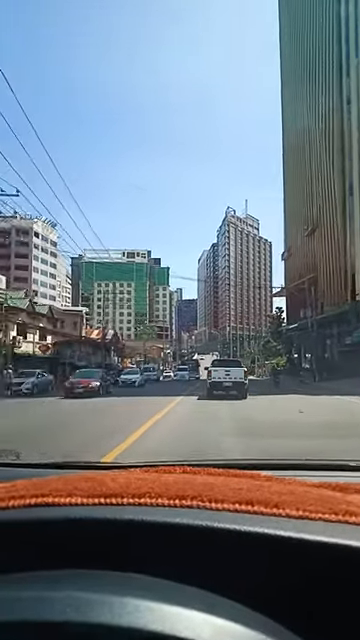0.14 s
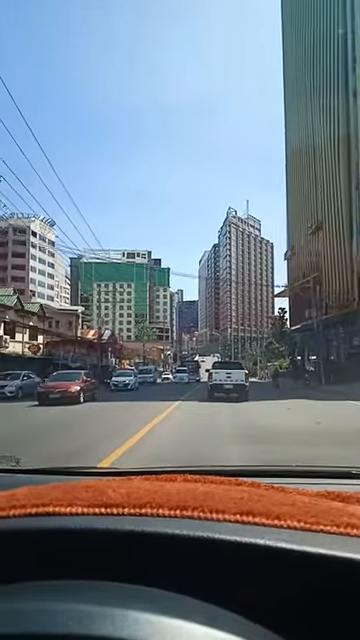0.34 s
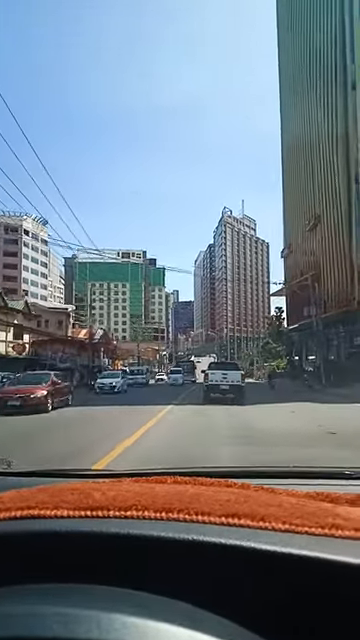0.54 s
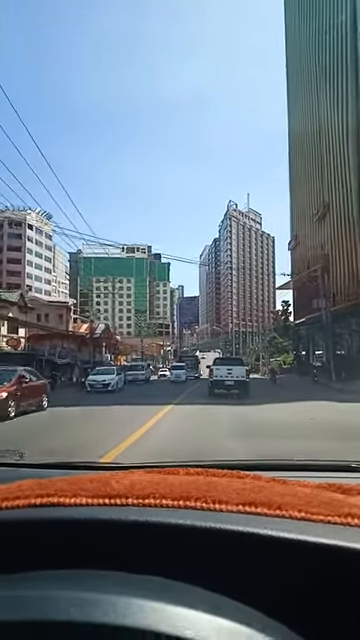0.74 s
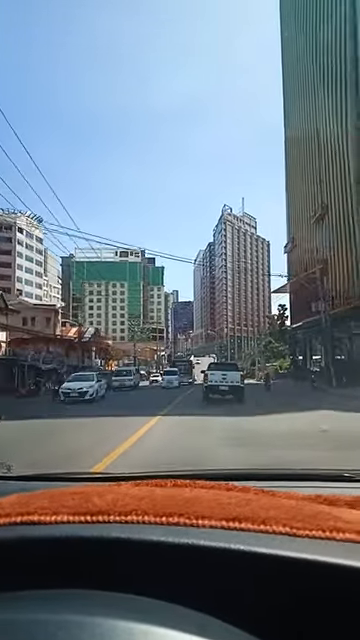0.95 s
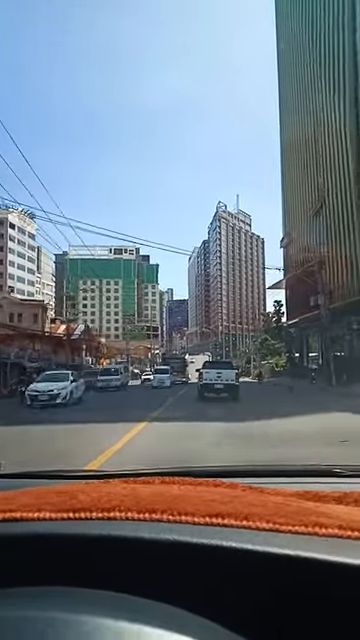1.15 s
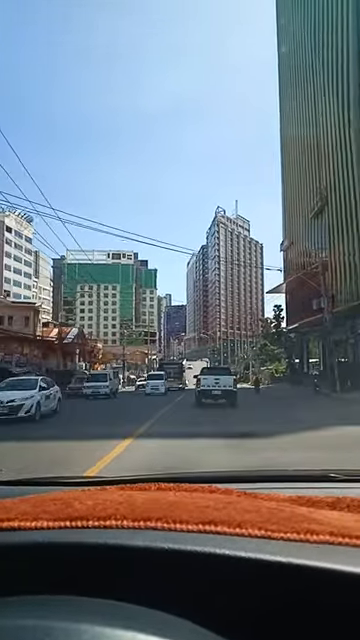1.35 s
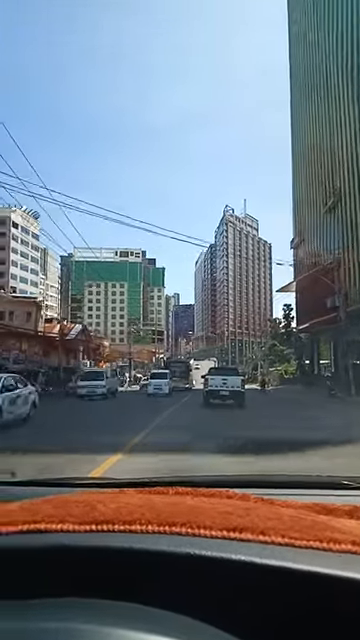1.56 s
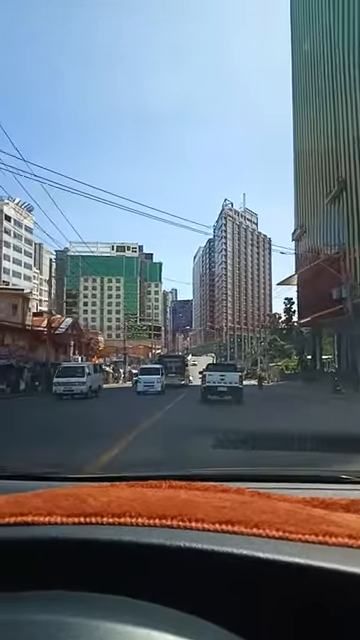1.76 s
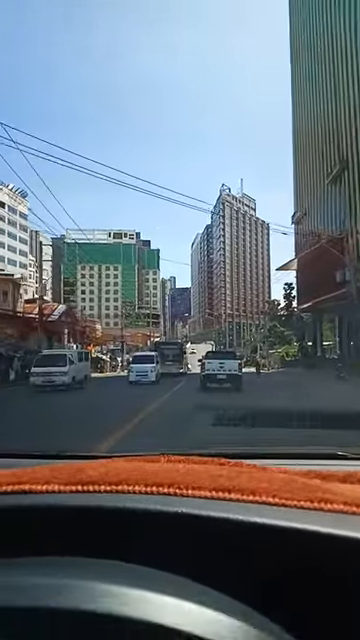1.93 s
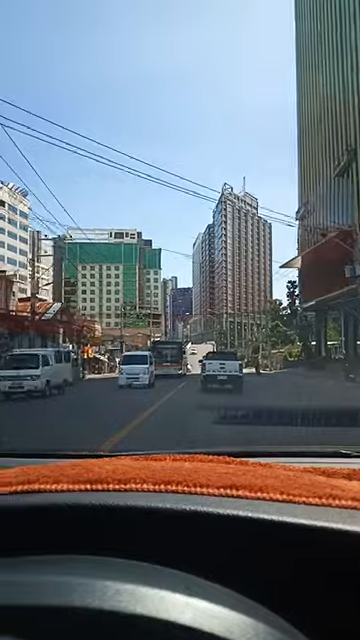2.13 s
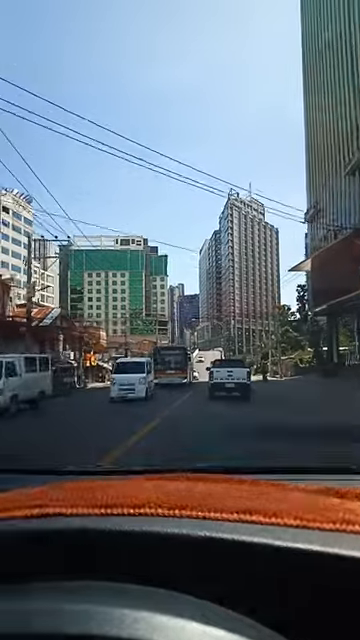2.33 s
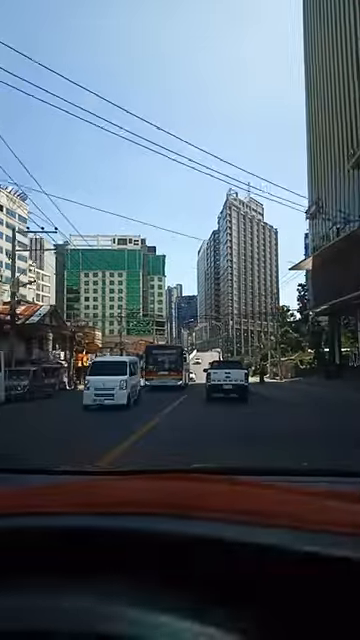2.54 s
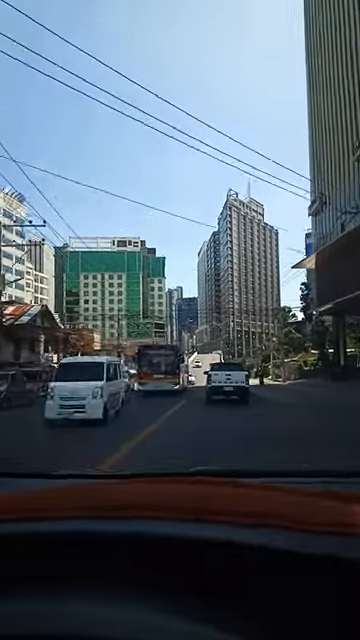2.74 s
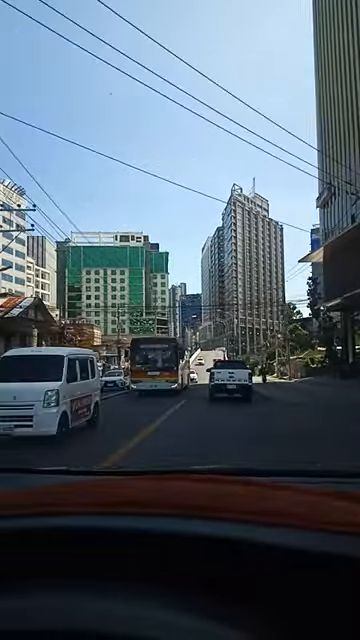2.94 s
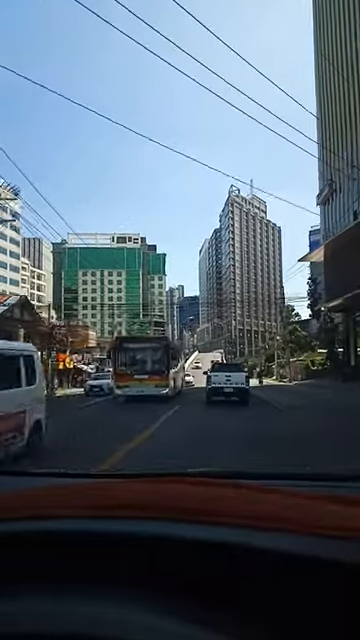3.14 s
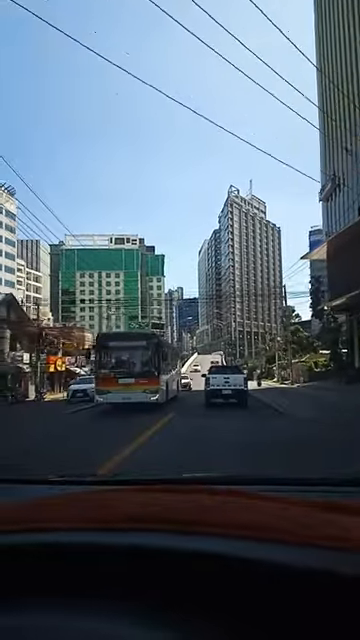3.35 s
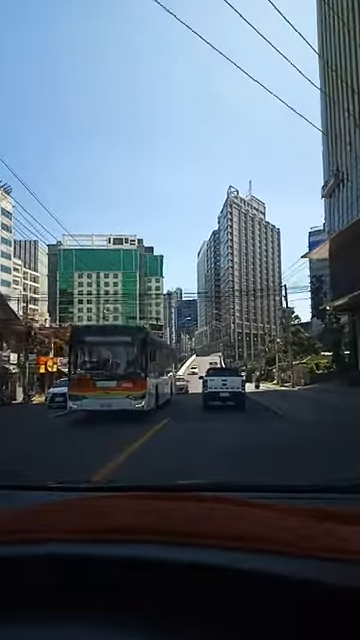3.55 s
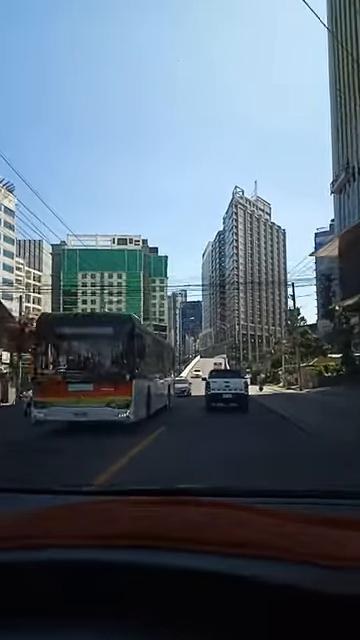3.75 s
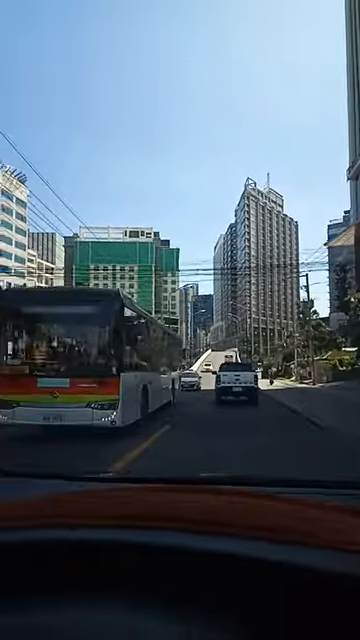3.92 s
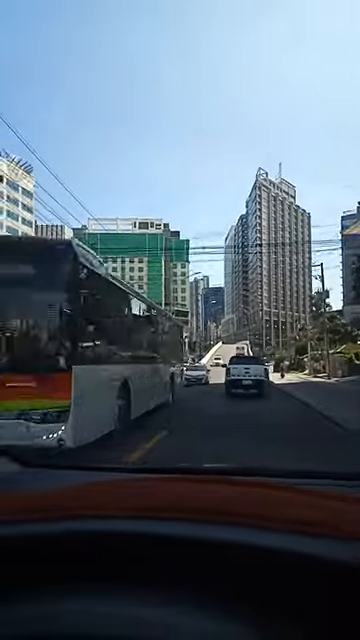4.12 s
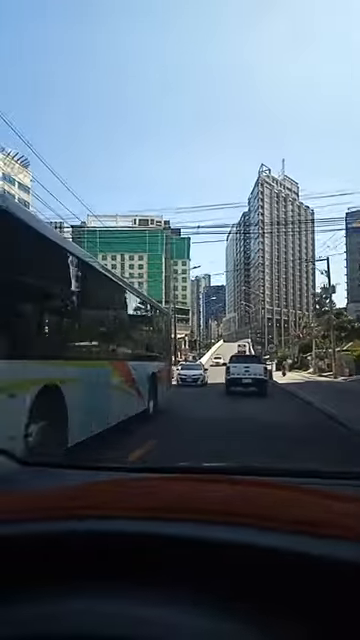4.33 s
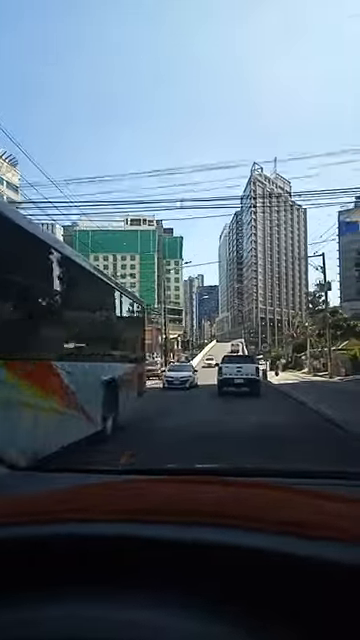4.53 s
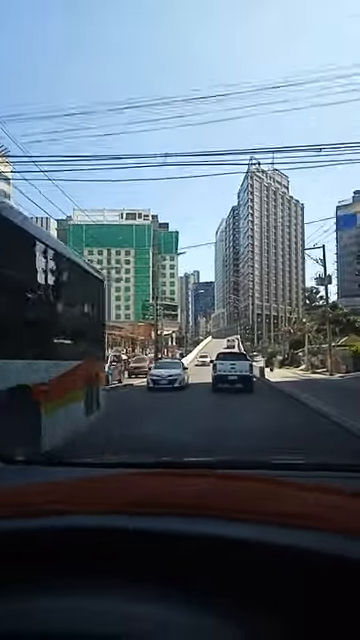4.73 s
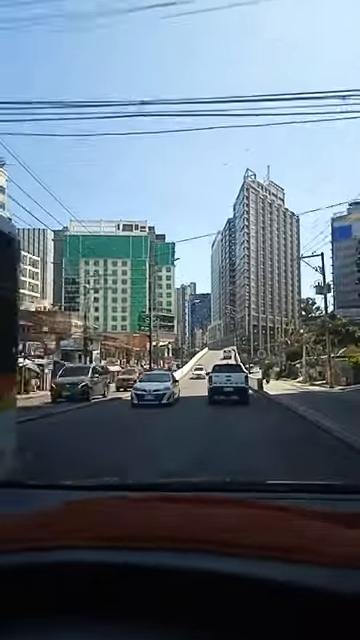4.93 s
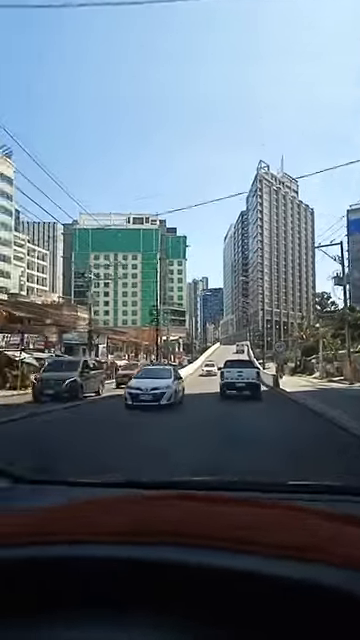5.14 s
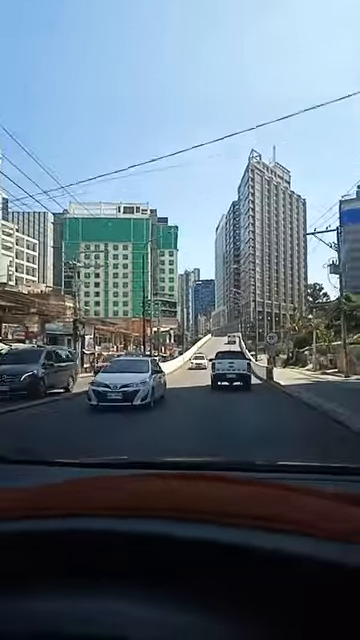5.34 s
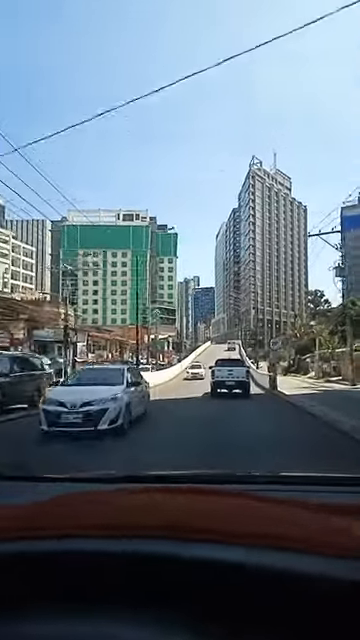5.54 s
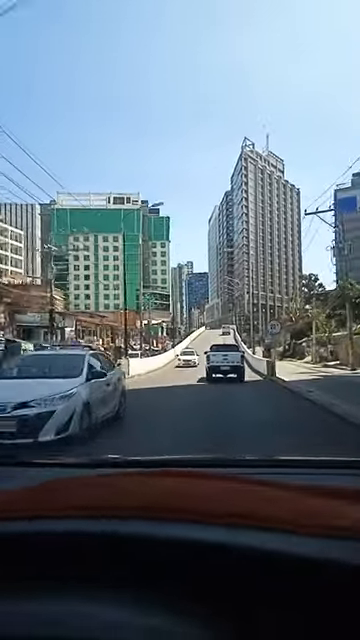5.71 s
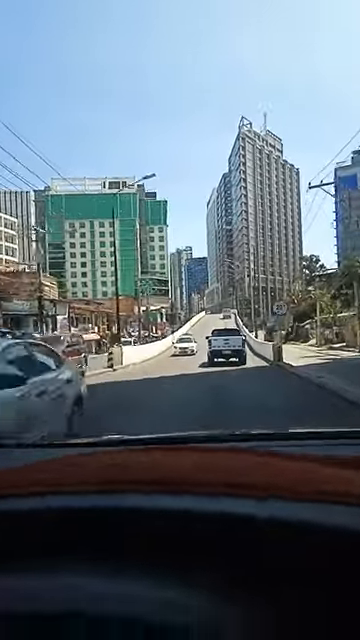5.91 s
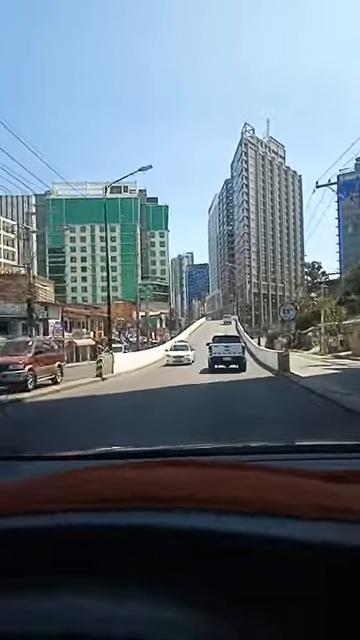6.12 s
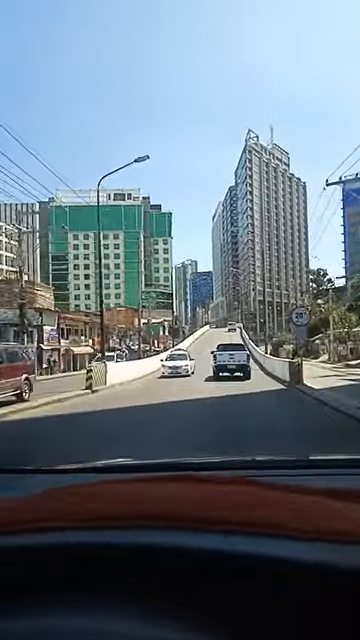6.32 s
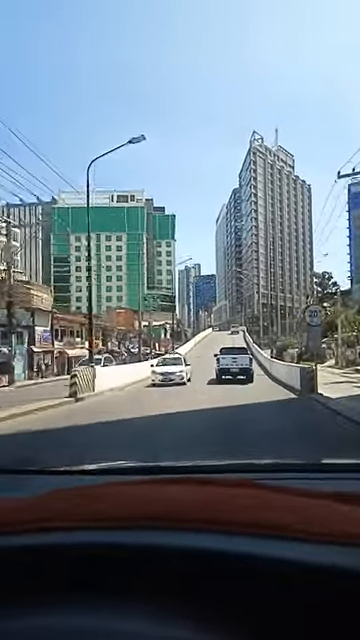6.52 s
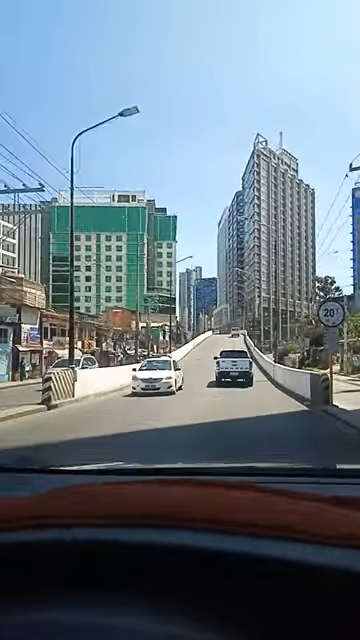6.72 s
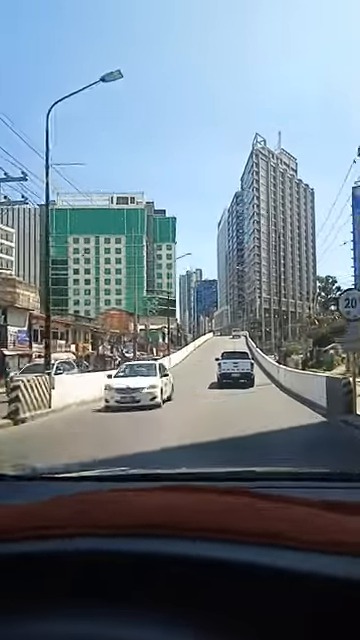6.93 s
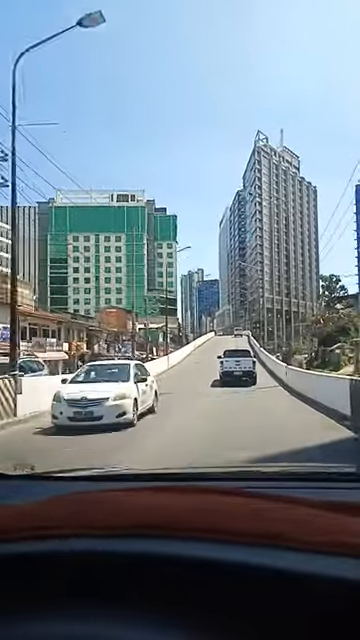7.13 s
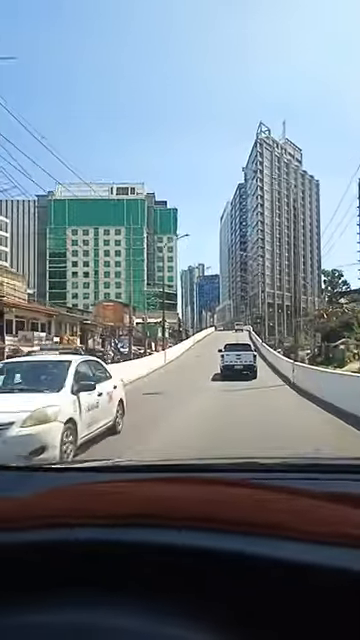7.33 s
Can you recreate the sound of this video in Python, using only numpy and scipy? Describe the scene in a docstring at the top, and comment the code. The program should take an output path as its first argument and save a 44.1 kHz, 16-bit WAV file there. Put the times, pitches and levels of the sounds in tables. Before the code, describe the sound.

Muffled cabin road noise throbs and knocks along a city street, swelling with a passing bus's deep boom before humming up a ramp.

```python
"""Inside a closed car rolling along a city street, with a phone as the microphone at the driver's seat.
The tyres drum through the body and ring the cabin (coloured noise), air rushes softly, small bumps throb.
The wheels knock over seams (decaying body tones) and the trim clacks now and then (noise bursts).
An oncoming bus booms past at about five seconds (engine orders with a Doppler drop, and a rumbling wake);
then the car pulls onto a ramp, where the surface is coarser and its own engine hums a little louder."""
import sys
import numpy as np
from scipy import signal
from scipy.fft import rfft, irfft
from scipy.io import wavfile
from scipy.ndimage import uniform_filter1d, map_coordinates

SR = 44100
rng = np.random.default_rng(int(sys.argv[2]) if len(sys.argv) > 2 else 0)


def persist_wave(psi):
    """Save psi, clipped to +-1, as 16-bit WAV."""
    counts = np.round(np.clip(psi, -1, 1) * 32767).astype(np.int16)
    wavfile.write(sys.argv[1], SR, np.atleast_2d(counts).T)


N = 329420
T = np.arange(N) / SR  # time [s]
RAMP_S, RAMP_FADE_S = 5.56, 0.52  # the ramp's coarser surface: middle and length of the change [s]

# cabin and tyre-cavity resonances: (centre [Hz], width [Hz], lift [dB])
CABIN_MODES = [(58, 11, 5.5), (83, 11, 5), (168, 16, 2), (317, 17, 1), (420, 28, -1), (469, 38, 5.5),
               (663, 65, 3), (933, 12, 7), (1107, 43, -3.5), (1158, 35, 3.5), (1480, 25, 4.5),
               (1631, 66, 5), (1800, 50, 2), (1948, 29, 6), (2108, 50, 3), (2400, 59, 3), (2720, 120, 1.5)]


def undb(db):
    """Decibels to gain."""
    return 10 ** (np.asarray(db) / 20)


def unit(x):
    """Scale to rms 1."""
    return x / np.sqrt(np.mean(x ** 2))


def walk(rate):
    """Smooth random wander with rms 1, from random steps drawn `rate` times a second."""
    k = int(SR / rate)
    steps = np.repeat(rng.standard_normal(N // k + 1), k)
    smooth = uniform_filter1d(uniform_filter1d(steps, k), k)
    return unit(smooth[:N])


def noise(colour, resonances=()):
    """Random forcing heard through a broad colour and narrow resonances; rms 1."""
    f = np.arange(N // 2 + 1) * SR / N
    hz, db = np.transpose(colour)
    gain_db = np.interp(np.log(f + 1), np.log(hz), db)
    for centre, width, lift_db in resonances:
        gain_db = gain_db + lift_db * np.exp(-2 * ((f - centre) / width) ** 2)
    muffle = np.maximum(f / hz[-1], 1) ** -2  # less and less gets through above the last point
    spectrum = rfft(rng.standard_normal(N))
    return unit(irfft(spectrum * undb(gain_db) * muffle, N))


def push_and_decay(age, rise, t60):
    """Envelope of a soft contact: a short linear push, then a free decay of 60 dB in t60 seconds."""
    return np.minimum(age / rise, 1) * undb(-60 * np.maximum(age - rise, 0) / t60)


def blow(start, rise, t60):
    """A soft contact that begins at a given moment."""
    return push_and_decay(np.maximum(T - start, 0), rise, t60)


def ramp(middle, length):
    """Goes evenly from 0 to 1, centred on a moment."""
    return np.clip((T - middle) / length + .5, 0, 1)


def hump(middle, half_length):
    """Rises smoothly from 0 to 1 and back."""
    return np.exp(-((T - middle) / half_length) ** 2)


def waver(x, share, rate):
    """Plays a sound at a wandering speed, so every pitch drifts by a small share."""
    position = np.cumsum(1 + share * walk(rate=rate))
    return map_coordinates(x, [position], order=3, mode="mirror")


def engine(hz, db, orders, jitter, rough_db):
    """Orders of an unsteady firing rate [Hz], each throbbing on its own by rough_db; db sets the level."""
    phase = 2 * np.pi * np.cumsum(hz * (1 + jitter * walk(rate=20))) / SR
    tone = 0
    for k, order_db in orders:
        throb = undb(order_db + rough_db * walk(rate=13))
        tone = tone + throb * np.sin(k * phase + rng.uniform(0, 2 * np.pi))
    return unit(tone) * undb(db)


def road(patchy_db=1.77, flutter_db=1.5, patter_db=1.1, grain_db=1.24, gust_db=0.7):
    """Uneven asphalt shakes body and tread, whose ring drifts in pitch; the air barely wavers."""
    # colours of body rumble, tread through doors and floor, coarse-asphalt drone, and air from
    # the vents and round the windows: (frequency [Hz], relative density [dB])
    rumble_colour, tread_colour = [(18, -32.5), (28, -18), (42, -18), (56, -6), (68, -10.5), (85, -3.5),
                                   (125, -0.5), (172, -3), (205, -10.5), (270, -21), (370, -23),
                                   (450, -33.5), (800, -54)], [(200, 1), (380, -2), (480, -1.5), (570, 0), (690, -0.5),
                                                   (770, -4), (1000, -10.5), (1400, -19.5), (2500, -41),
                                                   (5000, -68.5)]
    drone_colour, air_colour = [(140, -34.5), (225, 2), (340, 0.5), (400, -4), (520, -24.5), (900, -38)], [(300, 5), (1000, 1.5), (1650, 0), (2400, -6),
                                                       (3000, -8), (3500, -10.5), (4000, -16),
                                                       (4500, -23.5), (5500, -35), (9000, -59.5)]
    # worn stretches that raise the drone: (middle [s], half length [s], lift [dB])
    worn_stretches = [(1.5, 0.54, 6.5), (3.1, 0.48, 4.5), (7.346, 0.1, 3.5)]

    coarse = ramp(RAMP_S, RAMP_FADE_S)
    climb_s = np.maximum(T - RAMP_S, 0)
    beside_bus = hump(5.25, 0.46)  # the bus's tyres roll by
    worn_db = sum(lift_db * hump(s, half) for s, half, lift_db in worn_stretches)

    # base level [dB], then what the gathering speed, ramp, climb [dB/s] and bus tyres add
    rumble_db = -41 + 0.36 * T - 0.6 * coarse
    tread_db = -51 - 0.15 * coarse + 1.25 * climb_s + 2.5 * beside_bus
    drone_db = -56.5 + worn_db + 5 * coarse + 3 * climb_s + 8 * beside_bus
    air_db = -58.5 + 0.85 * coarse + 1 * beside_bus

    patches = patchy_db * walk(rate=16)
    rumble = noise(rumble_colour, CABIN_MODES) * undb(rumble_db + patches + flutter_db * walk(rate=45))
    tread = noise(tread_colour, CABIN_MODES)
    tread = tread * undb(tread_db + patter_db * walk(rate=28) + grain_db * walk(rate=70))
    drone = noise(drone_colour, CABIN_MODES) * undb(drone_db + patchy_db * walk(rate=20))
    air = noise(air_colour, CABIN_MODES) * undb(air_db + gust_db * walk(rate=14))
    return rumble + waver(tread + drone, share=.025, rate=7) + air


def rings(drift=.04, max_drift_hz=16, swell_db=2.5, ramp_db=2):
    """Rolling tyres sound a few resonances, each swelling alone and sliding in pitch as the load shifts."""
    # tyre and body resonances: (centre [Hz], width [Hz], rms level on the smooth street [dB])
    ring_modes = [(176, 18, -51), (334.6, 30, -62.5), (491.7, 36, -60.5), (665.5, 50, -62)]
    out = 0
    for hz, width, db in ring_modes:
        drift_hz = min(drift * hz, max_drift_hz)
        phase = 2 * np.pi * np.cumsum(hz + drift_hz * walk(rate=6)) / SR
        # two slow random weights make a narrow band of noise round the moving pitch
        ring = walk(rate=2 * width) * np.cos(phase) + walk(rate=2 * width) * np.sin(phase)
        out = out + unit(ring * undb(swell_db * walk(rate=9))) * undb(db)
    return out * undb(ramp_db * ramp(RAMP_S, RAMP_FADE_S))


def bumps(count=95, middle_hz=148.3, pitch_spread=0.27, middle_db=-37, scatter_db=4.0):
    """Small bumps in the asphalt set the body throbbing at uneven moments and at differing pitches."""
    out = np.zeros(N + SR // 4)
    age = np.arange(SR // 4) / SR
    shape = push_and_decay(age, rise=0.018, t60=0.07)
    for k, (place, pitch, size) in enumerate(rng.uniform(-0.996, 1, (count, 3))):
        i = int((k + .5 + .5 * place) / count * N)  # anywhere within its own slot
        hz = middle_hz * (1 + pitch_spread * pitch)
        throb = shape * np.sin(2 * np.pi * hz * age)
        out[i:i + len(age)] += undb(middle_db + scatter_db * size) * throb
    return out[:N]


def trim(panel_width_hz=170, panel_db=6):
    """Plastic trim knocks as the body flexes: a clack coloured by the struck panel, over a dull body."""
    # knocks: (time [s], clack level [dB], dull body level [dB], rise [s], t60 [s], panel ring [Hz]);
    # the levels are rms before the envelope
    knocks = [(2.709, -49.5, -55, .007, 0.17, 960), (3.943, -46, -43, 0.0031, .13, 1280),
              (3.964, -54, -47, .004, 0.07, 1240), (5.09, -59, -60, 0.013, 0.17, 1000),
              (5.18, -54, -54, .01, 0.15, 980)]
    # colours of the clack and the dull body: (frequency [Hz], relative density [dB])
    clack_colour, body_colour = [(450, -13), (800, 2.5), (1200, 5.5), (1600, 2), (1850, 0), (2200, -7),
                                 (2600, -12.5), (3400, -20.5), (5000, -38)], [(200, -16.5), (370, 3.5), (480, 1.5), (620, -24),
                                                     (900, -24.5)]
    out, body = 0, noise(body_colour)
    for s, clack_db, body_db, rise, t60, panel_hz in knocks:
        clack = noise(clack_colour, [(panel_hz, panel_width_hz, panel_db)])
        knock = undb(clack_db) * clack + undb(body_db) * body
        out = out + knock * blow(s, rise, t60)
    return out


def seams(lead_s=0.018, floor_hz=97, boom_hz=56):
    """The tread slaps the edge first; then the body rings, the floor thuds and the cabin air booms."""
    # wheels over seams: (time [s], body ring [Hz], ring level [dB], ring rise [s], ring t60 [s],
    # floor thud level [dB], cabin boom level [dB], tread slap level [dB]);
    # the levels are tone amplitudes, and rms for the slap, before the envelopes
    wheel_knocks = [ (0.102, 163, -33, 0.039, 0.19, -55, -42, -43.5),
                    (0.494, 151, -30.5, 0.011, 0.19, -38, -33, -46),
                    (0.718, 159, -29.5, 0.028, .11, -50, -50, -62),
                    (1.212, 152.5, -29.5, .038, .12, -39, -48, -56),
                    (1.605, 152, -29.5, 0.03, .12, -44, -46, -50),
                    (1.91, 159, -31.5, .018, 0.19, -52, -52, -56),
                    (2.53, 153.3, -31, 0.038, .11, -50, -54, -68),
                    (2.705, 158.5, -31.5, 0.022, 0.15, -48, -55, -57),
                    (2.865, 150, -30.5, 0.027, .13, -52, -58, -60),
                    (2.912, 138.6, -28.5, 0.022, .09, -48, -55, -55),
                    (3.045, 155, -33, 0.022, 0.15, -52, -49, -61),
                    (3.126, 161, -44, 0.0078, .1, -53, -55, -47),
                    (3.304, 161, -31, 0.024, .1, -49, -50, -45),
                    (3.375, 157.4, -26.5, 0.01, 0.081, -54, -39, -62),
                    (3.412, 135, -31, 0.023, .1, -46, -43, -58),
                    (3.545, 166.5, -30.5, 0.037, 0.091, -43, -45, -62),
                    (3.936, 159.6, -35, .015, 0.18, -36, -54, -43),
                    (4.0, 150, -27, 0.009, 0.1, -33, -53, -48),
                    (4.146, 163.3, -20.5, 0.0049, .17, -35, -35, -41.5),
                    (4.238, 168, -29, 0.0079, 0.1, -50, -48, -51),
                    (4.385, 163, -29.5, 0.037, .17, -41, -39, -60),
                    (4.48, 148.5, -31.5, 0.017, 0.18, -50, -45, -46),
                    (4.981, 161.2, -28.5, 0.017, 0.28, -25.5, -42, -49),
                    (5.045, 154, -25.5, 0.03, 0.17, -36, -46, -55),
                    (5.178, 152, -23, 0.014, 0.18, -29.5, -42, -57),
                    (5.364, 154, -28.5, .022, 0.15, -43, -43, -56),
                    (5.462, 161, -33.5, .012, .14, -39, -42, -44.5),
                    (5.67, 154.5, -29.5, 0.033, 0.11, -34, -44, -60),
                    (5.82, 142, -33, .012, 0.19, -33, -35, -45),
                    (5.92, 160, -26.5, .014, 0.13, -33, -49, -61),
                    (6.181, 155, -29.5, 0.022, 0.22, -36, -40, -57),
                    (6.407, 161, -28, 0.015, 0.17, -50, -37, -56),
                    (6.625, 166.4, -29.5, .035, 0.14, -40, -37, -63),
                    (6.73, 149, -30, .018, 0.11, -48, -48, -63),
                    (6.84, 160, -41, 0.0099, 0.11, -56, -52, -46),
                    (6.981, 161, -44, 0.004, 0.09, -33.5, -48, -47),
                    (7.125, 147, -29, .035, .14, -49, -51, -50)]
    # colour of the tread slap: (frequency [Hz], relative density [dB])
    slap_colour = [(200, -22), (420, 4.5), (680, 4), (820, -12.5), (1000, -28), (1500, -24), (4000, -43)]
    slap_noise, out = noise(slap_colour, CABIN_MODES), 0
    for s, ring_hz, ring_db, rise, t60, floor_db, boom_db, slap_db in wheel_knocks:
        turns = 2 * np.pi * (T - s)
        ring = undb(ring_db) * np.sin(ring_hz * turns) * blow(s, rise, t60)
        thud = undb(floor_db) * np.sin(floor_hz * turns) * blow(s, rise=0.022, t60=0.24)
        boom = undb(boom_db) * np.sin(boom_hz * turns) * blow(s, rise=0.02, t60=0.35)
        slap = undb(slap_db) * slap_noise * blow(s - lead_s, rise=0.015, t60=0.085)
        out = out + slap + ring + thud - boom  # the boom starts with the opposite sign
    return out


def own_engine(firing_hz=43.3):
    """The car's own engine hums at an unsteady firing rate, its level following the throttle."""
    # throttle: (time [s], level [dB])
    throttle = [(0, -56), (3.9, -62), (4.3, -57), (5.3, -50), (5.56, -40), (6.05, -44), (6.9, -53),
                (7.47, -40.5)]
    # engine orders: (multiple of the firing rate, relative level [dB])
    own_orders = [(1, -0.5), (2, -20), (3, -6), (4, -11.5), (5, -21)]
    level_db = np.interp(T, *np.transpose(throttle))
    return engine(firing_hz, level_db, own_orders, jitter=0.07, rough_db=0.0)


def bus(firing_hz=88, closing_m_s=28, lane_m=3.0, abreast_s=5.62):
    """The bus booms past in surges, its pitch dropping from approach to retreat; its wake shakes the car."""
    # boom of the bus engine: (time [s], level [dB])
    surges = [(4.9, -78), (5.21, -41), (5.245, -24), (5.29, -27.5), (5.405, -26), (5.435, -34),
              (5.47, -30.5), (5.57, -43), (5.65, -35.5), (6.1, -46), (6.7, -75)]
    # bus engine orders: (multiple of the firing rate, relative level [dB])
    bus_orders = [(1 / 2, -25), (5 / 6, -13.5), (0.97, 0), (4 / 3, -19), (5 / 3, -15), (1.5, -22), (3, -23)]
    # colour of the wake against the side of the car: (frequency [Hz], relative density [dB])
    wake_colour = [(25, -14), (42, 2.5), (60, -6), (85, 1.5), (125, -4.5), (190, -11.5), (280, -19.5),
                   (370, -15.5), (480, -35.5), (700, -33), (850, -27.5), (1050, -33), (1500, -50)]
    along_m = closing_m_s * (T - abreast_s)
    receding_m_s = closing_m_s * along_m / np.hypot(along_m, lane_m)
    heard_hz = firing_hz / (1 + receding_m_s / 343)  # Doppler, speed of sound 343 m/s
    buffet_db = 2.2 * walk(rate=30)  # the wake pushes unevenly
    wake = noise(wake_colour) * undb(-37.5 + buffet_db) * hump(5.466, 0.38)
    level_db = np.interp(T, *np.transpose(surges))
    return engine(heard_hz, level_db, bus_orders, jitter=0.0253, rough_db=1.5) + wake


def scene():
    """Everything as it arrives at the driver's seat."""
    own = own_engine()
    return (road() + rings() + own + bus() + seams() + bumps() + trim())[None]


def record(dry, low_cut_hz=24, top_hz=15550):
    """The phone drops the deepest bass, adds a faint hiss that rises slowly and swells briefly, cuts the top."""
    # hiss before the top cut [dB]: a slow rise [dB/s] and a brief swell
    hiss_db = -76 + 0.1152 * T + 1.7 * hump(5.64, .45)
    bass_cut = signal.butter(4, low_cut_hz, "high", fs=SR, output="sos")
    sound = signal.sosfilt(bass_cut, dry)
    ease = np.minimum(np.minimum(T, T[-1] - T) / .006, 1)  # soft ends
    sound = sound * ease + undb(hiss_db) * rng.standard_normal(N)
    top_cut = signal.ellip(12, .1, 80, top_hz, fs=SR, output="sos")
    return signal.sosfilt(top_cut, sound)


dry = scene()
out = record(dry)
persist_wave(out)
```